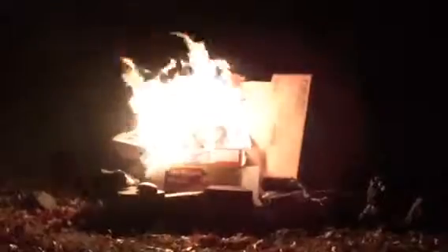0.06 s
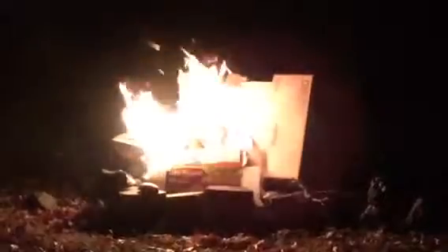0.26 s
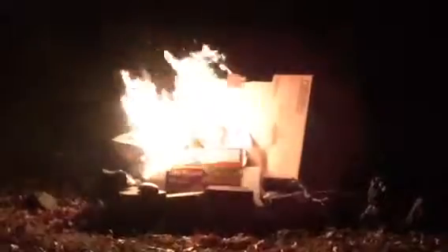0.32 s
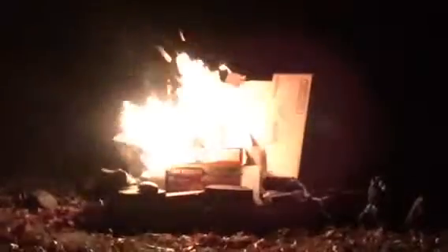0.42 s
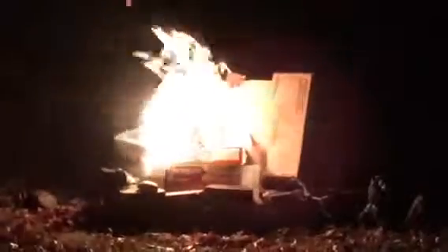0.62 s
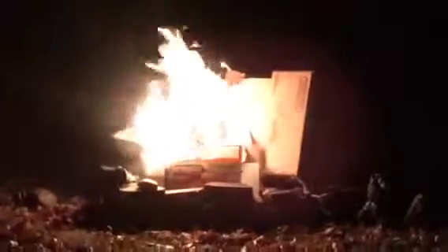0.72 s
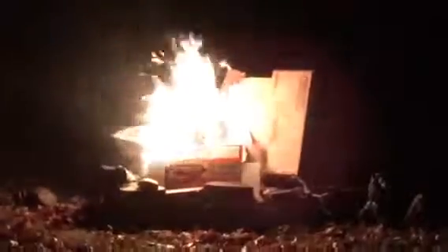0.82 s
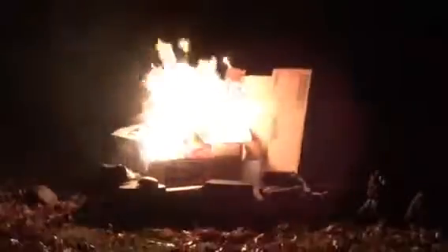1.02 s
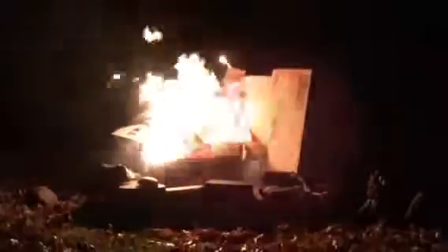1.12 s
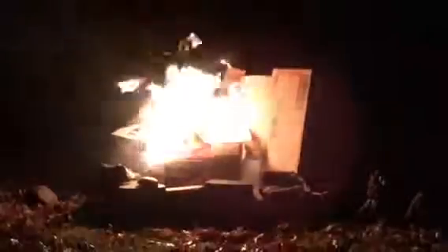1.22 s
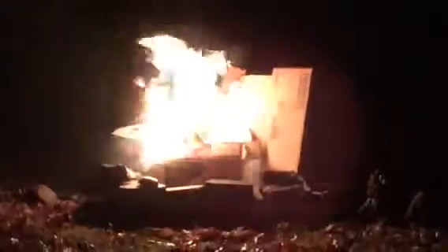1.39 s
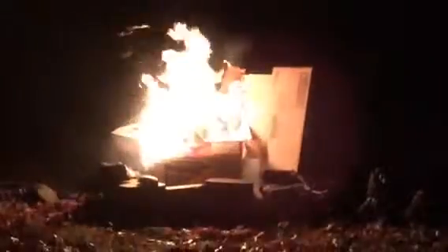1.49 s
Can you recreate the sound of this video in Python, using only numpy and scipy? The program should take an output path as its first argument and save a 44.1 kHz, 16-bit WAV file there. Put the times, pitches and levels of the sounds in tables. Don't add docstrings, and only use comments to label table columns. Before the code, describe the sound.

A bonfire burns at night, flames flapping in low soft puffs with sharp woody crackles

```python
import sys
import numpy as np
from scipy import signal
from scipy.fft import rfft, irfft
from scipy.io import wavfile
from scipy.ndimage import uniform_filter1d

SR = 44100
rng = np.random.default_rng(int(sys.argv[2]) if len(sys.argv) > 2 else 0)


def boost_factor(decibels):
    exponent = np.asarray(decibels, float) / 20
    return 10 ** exponent


def to_wav(sig):
    pcm = np.clip(np.atleast_2d(sig), -1, 1) * 32767
    pcm = np.round(pcm).astype(np.int16)
    wavfile.write(sys.argv[1], SR, pcm.T)


N = 68355

# (time [s], peak level [dB], pitch [Hz], edge level re peak [dB])
PUFFS = [(0.117, -48.5, 118, -34), (0.216, -40, 79, -25), (0.252, -49, 79.6, -19), (0.298, -38.5, 98, -35),
         (0.321, -45, 77, -22), (0.336, -47.5, 87, -17), (0.363, -39.5, 110, -24), (0.43, -26, 133, -16.5),
         (0.462, -36.5, 180, -14.5), (0.484, -40.5, 135, -13.5), (0.528, -35, 128, -16.5),
         (0.558, -57, 146, -31), (0.594, -30.5, 130, -40), (0.643, -42, 113, -14), (0.679, -31.5, 144, -36),
         (0.698, -37.5, 130.5, -9), (0.73, -37.5, 103, -42), (0.754, -35, 96, -46), (0.843, -44, 141, -47),
         (0.948, -46.5, 77, -18), (0.965, -37, 138, -14.5), (0.993, -47.5, 95, -11.5),
         (1.021, -38.5, 93.6, -24), (1.07, -38, 120.6, -22), (1.148, -54, 108, -22),
         (1.163, -41.5, 122, -21), (1.199, -45, 107, -18), (1.237, -34, 102, -19),
         (1.263, -34.5, 128.5, -16.5), (1.467, -48.5, 85, -44)]
PUFF_CYCLES, FALL_STRETCH = .72, 1.35
EDGE_RATIO, EDGE_CYCLES = 2.1, .55
BODY_RATIO, BODY_DB = .66, -8.5


def big_flaps(t):
    out = np.zeros(N)
    for time_s, db, hz, edge_db in PUFFS:
        cycles = (t - time_s) * hz
        lean = rng.uniform(-.25, .25)
        main = swing(cycles, PUFF_CYCLES, lean)
        edge = boost_factor(edge_db + 8) * swing(cycles * EDGE_RATIO, EDGE_CYCLES, lean * EDGE_RATIO)
        body = boost_factor(BODY_DB) * swing(cycles * BODY_RATIO, EDGE_CYCLES, lean * BODY_RATIO)
        out += rng.choice([-1, 1]) * boost_factor(db) * (main + edge + body)
    return out


# (time [s], peak level [dB], pitch [Hz])
FLUTTERS = [(0.015, -53, 90), (0.055, -57, 70), (0.085, -52, 165), (0.145, -58, 110), (0.172, -53, 100),
            (0.19, -53, 140), (0.39, -43, 76.6), (0.447, -34, 137), (0.497, -44.5, 176), (0.543, -43, 121),
            (0.581, -41, 130), (0.71, -46, 99), (0.771, -46, 102), (0.81, -55, 121), (0.877, -52, 126),
            (0.914, -53.5, 129), (1.04, -47, 87), (1.087, -47.5, 115), (1.113, -51.5, 133),
            (1.179, -41.5, 146), (1.278, -39.5, 86), (1.409, -50.5, 95), (1.442, -49, 81),
            (1.507, -46.5, 69.6), (1.535, -53.5, 119)]
# (time [s], peak level [dB], pitch [Hz])
LICKS = [
    (0.456, -44, 360),
    (0.595, -39.5, 216),
    (0.69, -44, 370),
    (0.665, -46, 190),
    (0.47, -44, 200),
    (1.263, -44, 202),
    (.436, -34.5, 250),
]


def small_flaps(t):
    out = np.zeros(N)
    for time_s, db, hz in list(FLUTTERS) + list(LICKS):
        out += boost_factor(db) * swing((t - time_s) * hz, PUFF_CYCLES, rng.random())
    return out


def swing(cycles, length_cycles, turn):
    stretch = np.where(cycles > 0, FALL_STRETCH, 1)
    return np.exp(-(cycles / length_cycles / stretch) ** 2) * np.cos(2 * np.pi * (cycles + turn))


# (time [s], roar level [dB])
FLAME = [(0, -54), (.15, -58), (.3, -50.5), (.45, -43.5), (.7, -41.5), (.8, -53), (.95, -53.5),
         (1.13, -43.5), (1.28, -50), (1.34, -64), (1.39, -61), (1.55, -54.5)]
# (frequency [Hz], density [dB per Hz])
ROAR = [(18, -31), (30, -13.5), (76, 1.5), (140, -5.5), (193, -5), (316, -22), (500, -40.5), (650, -35),
        (1100, -120)]


def roar(t):
    effort_db = np.interp(t, *np.array(FLAME).T)
    return colour(rng.standard_normal(N), ROAR) * boost_factor(effort_db + 2.5 * walk(22) - 7)


# (time [s], wood peak level [dB], wood pitch [Hz], tick peak level [dB])
CRACKS = [(0.0269, -54, 1850, -73), (0.179, -61, 1787, -77), (0.3390, -54, 5780, -48),
          (0.4823, -47, 3700, -57), (0.6915, -55, 1200, -58.5), (0.7193, -47, 1770, -58),
          (0.7249, -53, 1658, -54), (0.7337, -53.5, 2040, -58), (0.7580, -58, 2130, -60),
          (0.7930, -46.5, 1020, -59), (0.8027, -38, 2100, -63), (0.8074, -52, 3200, -58),
          (0.8324, -38, 2460, -51.5), (0.8412, -64, 3305, -71), (0.8508, -49, 2470, -58),
          (0.8711, -41, 1927, -50), (0.8989, -52, 2120, -60.0), (0.9082, -37, 1900, -43.0),
          (0.928, -45, 2130, -58), (0.9597, -56, 1500, -55), (0.9711, -64, 3273, -54),
          (1.0827, -54, 1421, -65), (1.0899, -58.5, 2090, -75), (1.1401, -39.5, 2620, -51.5),
          (1.2846, -56, 2034, -71), (1.2993, -38, 2140, -48.5), (1.314, -54.5, 1442, -72),
          (1.4071, -59, 1900, -72)]
# (time [s], peak level [dB], pitch [Hz])
OVERTONES = [(0.3387, -62, 3260), (0.4825, -64, 2430), (0.4825, -58, 1070), (0.7193, -56, 6255),
             (0.7193, -72, 3030), (0.7249, -59, 4200), (0.7249, -56, 5975), (0.7337, -68, 3456),
             (0.7337, -59, 5000), (0.7925, -69, 5170), (0.7925, -73, 3450), (0.8030, -46, 3000),
             (0.8074, -70, 2239), (0.8074, -65, 1259), (0.9082, -36.5, 3390), (0.9082, -41.5, 6070),
             (0.9595, -58, 3326), (0.9595, -57, 4145), (1.1405, -58, 7149), (1.1405, -69, 6000),
             (1.2988, -47, 4500), (1.2988, -50.5, 5600)]
RISE_S, FALL_S, WOOD_HZ = .0008, .0011, 2200
TICK_S, TICK_LEAD_S = .0006, .0004
SPLINTER_DB = -11


def snaps(t):
    out = np.zeros(N)
    bright = unit(band(rng.standard_normal(N), 5500, 15000))
    splinters = unit(band(rng.standard_normal(N), 1140, 4930))
    for time_s, db, hz in [row[:3] for row in CRACKS] + list(OVERTONES):
        span = near(time_s)
        u = t[span] - time_s
        envelope = burst(u * max(hz / WOOD_HZ, 1) ** .85, RISE_S, FALL_S)
        out[span] += boost_factor(db - 2.5) * envelope * np.cos(2 * np.pi * (hz * u + rng.random()))
    for time_s, db, _, tick_db in CRACKS:
        span = near(time_s)
        noise = boost_factor(db + SPLINTER_DB) * splinters[span] + boost_factor(tick_db - 6) * bright[span]
        out[span] += burst(t[span] - time_s + TICK_LEAD_S, TICK_S / 3, TICK_S * 2) * noise
    return out


# (time [s], peak level [dB], pitch
# [Hz], decay [s])
RINGS = [(.7195, -52, 1520, .008), (.8470, -56, 1300, .003), (.4865, -56, 4950, .0007),
         (.4865, -60, 2500, .0007), (.4835, -58, 5200, .001), (.4838, -60, 2350, .0015),
         (1.2985, -48, 4400, .0008), (1.2987, -47, 3400, .0014), (1.1400, -45, 2100, .0007),
         (1.1400, -53, 3200, .002), (1.1412, -54, 1300, .001), (.7190, -54, 12500, .0006),
         (.7190, -55, 4500, .0008), (.7250, -56, 11500, .0006), (.7572, -54, 7400, .0008),
         (.7520, -60, 4800, .0007), (.7615, -62, 5500, .0007), (.7378, -57, 3500, .0008),
         (.7400, -57, 2600, .001), (.8030, -54, 7500, .0008), (.8325, -55, 11000, .0006),
         (.8320, -49, 1600, .0008), (.8325, -49, 3400, .002), (.8372, -58, 4500, .001),
         (.8410, -59, 8000, .0006), (.8715, -52, 10500, .001), (.8710, -50, 1350, .0008),
         (.8728, -48, 2200, .0008), (.8975, -57, 4500, .0006), (.9025, -56, 3200, .002),
         (.9130, -52, 1400, .001), (.9165, -49, 2000, .001), (.9212, -51, 1450, .001),
         (.9310, -51, 2150, .001), (.9315, -58, 9500, .0008), (.9320, -58, 4800, .0006),
         (.9375, -59, 2300, .001), (.9435, -57, 2000, .001), (.9595, -54, 2100, .0008),
         (.9640, -60, 7500, .0008), (.9785, -64, 5800, .003), (.8075, -50, 2300, .001),
         (.8575, -58, 2100, .001), (.4822, -53, 3000, .001), (.4822, -55, 4600, .001),
         (1.1398, -52, 6500, .001), (1.1398, -53, 4600, .001), (.8720, -50, 3000, .001),
         (.9075, -48, 2800, .001)]
RING_HZ = 2000


def rings(t):
    out = np.zeros(N)
    for time_s, db, hz, decay_s in RINGS:
        span = near(time_s)
        u = t[span] - time_s
        envelope = burst(u * max(hz / RING_HZ, 1) ** .7, min(RISE_S, decay_s), decay_s)
        out[span] += boost_factor(db) * envelope * np.sin(2 * np.pi * hz * t[span])
    return out


def cracks(t):
    bounce_s, bounce_db = .0042, -12.5
    direct = snaps(t) + rings(t)
    smear = rng.standard_normal(96) * np.exp(-np.arange(96) / 13.3)
    bounce = np.convolve(direct, smear / np.sqrt(np.sum(smear ** 2)))[:N]
    return direct + boost_factor(bounce_db) * np.interp(t - bounce_s, t, bounce)


def near(time_s):
    return slice(max(int((time_s - .05) * SR), 0), int((time_s + .05) * SR))


def burst(u, rise_s, fall_s):
    return np.exp(-np.minimum(u, 0) ** 2 / rise_s ** 2 - (np.maximum(u, 0) / fall_s) ** 1.4)


# (start [s], length [s])
SIZZLE_SPANS = [
    (.717, .068),
    (.792, .022),
    (.834, .03),
    (.872, .014),
    (.897, .01),
    (.909, .034),
]
# (start [s], length [s])
SIZZLE_SPANS_SOFT = [
    (.937, .045),
    (1.25, .075),
    (1.385, .11),
    (.2, .1),
    (1.42, .075),
    (.715, .11),
    (.81, .1),
    (.018, .03),
]
# (level [dB], centre [Hz], treble level [dB])
SIZZLES = [(-67, 2500, -5), (-62, 2500, -9), (-63, 2600, -7), (-58, 1900, -3.5), (-62, 2600, -15),
           (-58, 2100, -4), (-73.5, 3900, 1), (-73, 2700, -1), (-66.5, 2100, -19), (-66.5, 800, -27),
           (-70.5, 3250, -9), (-73, 4800, -2), (-67, 2700, -14), (-68, 2000, -12)]
TICKS_PER_S, TICK_SPREAD_DB = 5000, 1.5


def sizzle(t):
    happens = rng.random(N) < TICKS_PER_S / SR
    ticks = happens * rng.standard_normal(N) * boost_factor(TICK_SPREAD_DB * rng.exponential(size=N))
    ticks = ticks * boost_factor(1.2 * walk(160))
    treble = unit(band(ticks, 4500, 12000))
    out = np.zeros(N)
    spans = list(SIZZLE_SPANS) + list(SIZZLE_SPANS_SOFT)
    for (start_s, length_s), (db, hz, treble_db) in zip(spans, SIZZLES):
        rise = (t - start_s) / (.002 + 3 * length_s ** 2)
        fall = (start_s + length_s - t) / (.5 * length_s)
        gate = np.clip(np.minimum(rise, fall), 0, 1)
        wood = unit(band(ticks, hz / 1.97, hz * 1.4))
        treble_fade = np.exp(-np.maximum(t - start_s, 0) / length_s * 1.6)
        out += boost_factor(db) * gate * (wood + boost_factor(treble_db) * treble * treble_fade)
    return out


# (time [s], mid hiss level [dB])
DRAUGHT = [
    (0.0, -68),
    (0.816, -68),
    (0.91, -70),
    (1.55, -71),
]
# (frequency [Hz], density [dB per Hz])
HISS = [(120, -41), (200, 0), (258, -10.5), (305, -11.5), (366, -11.5), (1270, -17.5), (2080, -23.5),
        (14500, -36.5), (15900, -45)]
HISS_DB = -66.2


def hiss(t):
    draught_db = np.interp(t, *np.array(DRAUGHT).T) - HISS_DB + 2.3
    low = unit(band(colour(rng.standard_normal(N), HISS), 220, 1690))
    high = band(colour(rng.standard_normal(N), HISS), 1520, 21000)
    return boost_factor(HISS_DB) * (low * boost_factor(.9 * walk(8.95) + draught_db) + high * boost_factor(.5 * walk(7.6)))


def unit(x):
    return x / np.sqrt(np.mean(x ** 2))


def colour(x, shape):
    hz, db = np.array(shape, float).T
    f = np.maximum(np.arange(N // 2 + 1) * SR / N, 1)
    gain = boost_factor(np.interp(np.log(f), np.log(hz), db))
    return unit(irfft(rfft(x) * gain, N))


def band(x, lo_hz, hi_hz):
    return signal.sosfilt(signal.butter(2, [lo_hz, hi_hz], "band", fs=SR, output="sos"), x)


def walk(rate_hz):
    hold = int(SR / rate_hz)
    steps = np.repeat(rng.standard_normal(N // hold + 1), hold)
    return unit(uniform_filter1d(uniform_filter1d(steps, hold), hold)[:N])


def scene():
    t = np.arange(N) / SR
    flames = big_flaps(t) + small_flaps(t) + roar(t)
    return (flames + cracks(t) + sizzle(t) + hiss(t))[None]


def band_limit(x):
    return signal.sosfilt(signal.butter(12, 15790, fs=SR, output="sos"), x)


def record(dry):
    top_cut = signal.ellip(6, .3, 50, 15350, fs=SR, output="sos")
    mix = signal.sosfilt(top_cut, dry)
    return band_limit(mix)


dry = scene()
out = record(dry)
to_wav(out)
```